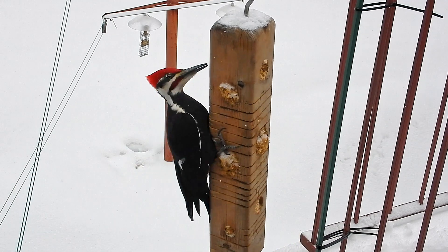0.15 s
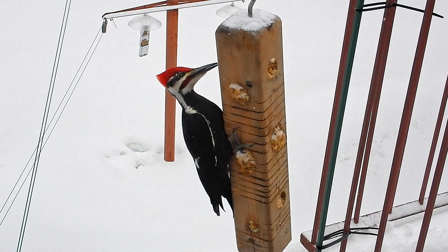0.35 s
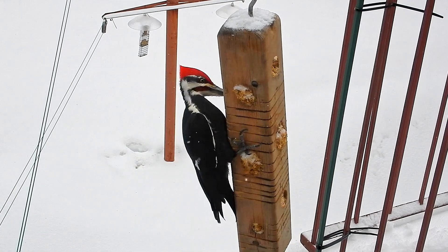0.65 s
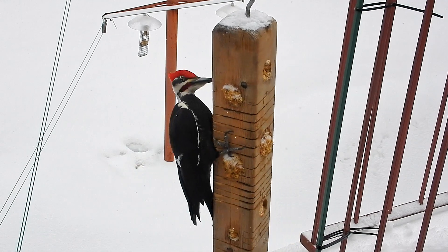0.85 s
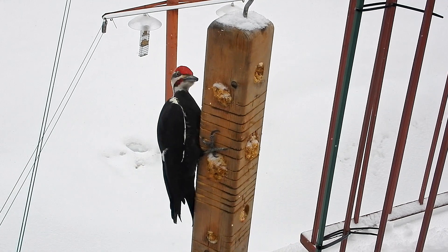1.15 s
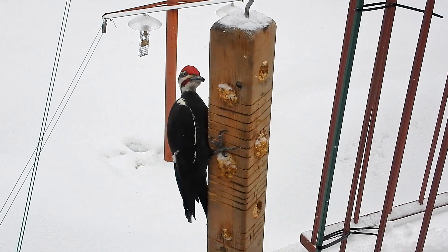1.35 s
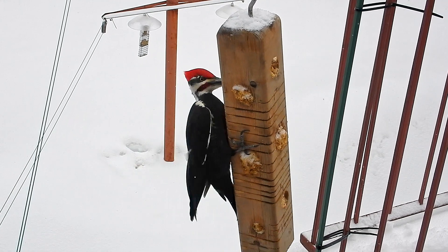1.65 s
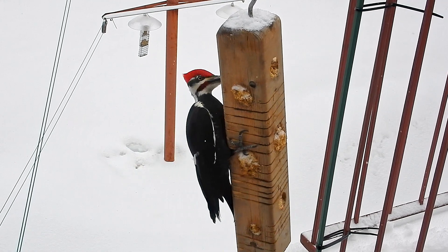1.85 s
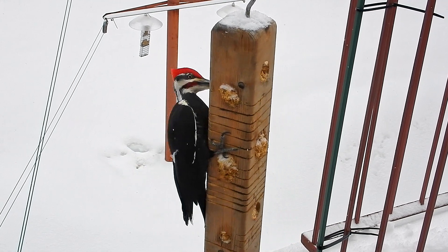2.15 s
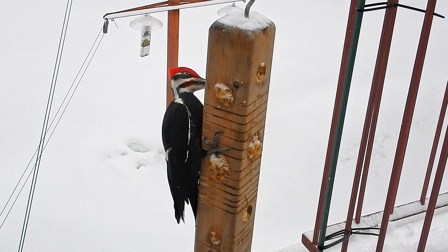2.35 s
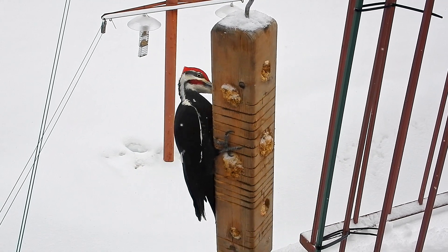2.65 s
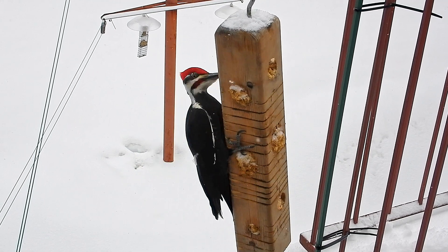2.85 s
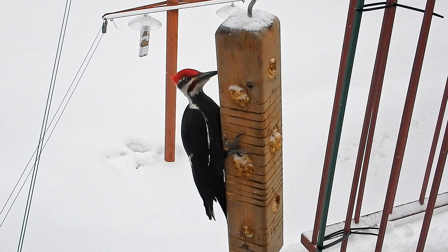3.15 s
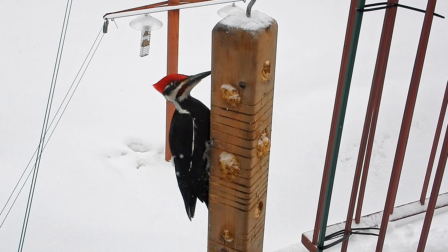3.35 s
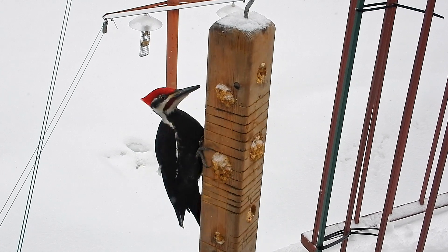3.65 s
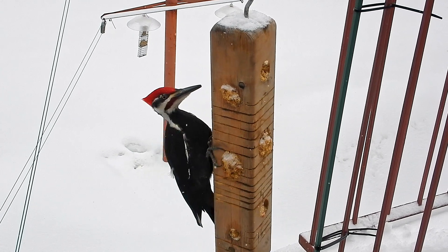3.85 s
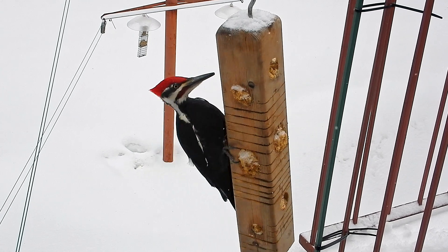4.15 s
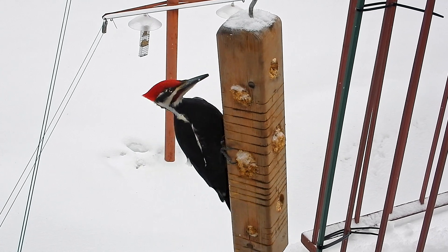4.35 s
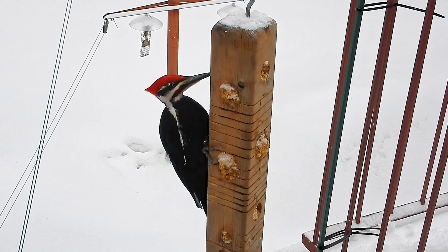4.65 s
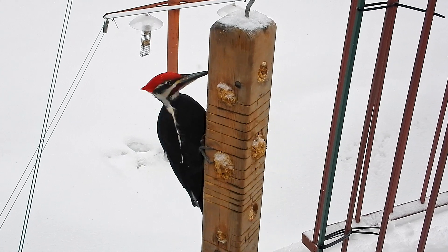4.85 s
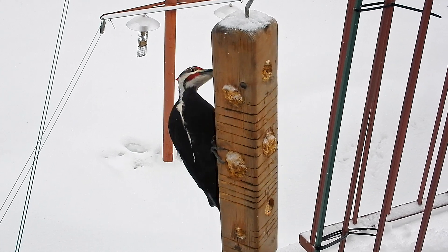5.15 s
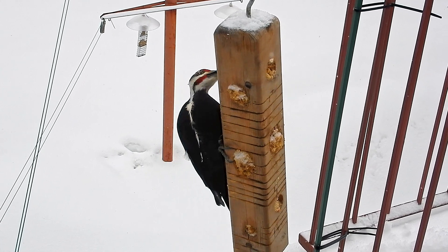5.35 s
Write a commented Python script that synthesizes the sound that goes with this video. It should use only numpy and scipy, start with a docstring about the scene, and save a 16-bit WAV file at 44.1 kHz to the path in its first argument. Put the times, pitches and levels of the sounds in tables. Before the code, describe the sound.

A quiet snowy yard, heard in stereo from close to a woodpecker on a hanging wooden log. From 0.2 to 4.05 s the bird gives sixteen very short nasal calls, each about a twentieth of a second, arching slightly up and down near 950 Hz with a strong octave and reedy upper tones. They are spaced 0.2 to 0.4 s apart, clearly foreground, with a faint dull echo. Small birds twitter thinly far off throughout, with occasional tiny gliding whistles, more frequent after 4.2 s. A high buzzy trill, about seventy pulses a second, swells from around 3.5 s, peaks near 4.2 s and breaks off. Soft wooden knocks follow near 4.5, 4.67 and 4.84 s, with lighter sharp clicks around 5.03 s; the log rings briefly and its hanger hums very faintly. Soft airy hush, slightly fuller at first, low rumbles, faint hum and hiss continue to 5.5 s.

```python
"""First a large woodpecker on a hanging log gives a row of short nasal calls, built from arching sine partials.
Small birds whistle (gliding sines) and twitter far off (many tiny notes) all along; near the end of the calls
a trill (two pulsing voices) swells up and breaks off.
Then bill and claws tap the log: soft knocks set its wood ringing, with sharp cracks and a humming hanger.
From start to end there is a soft outdoor hush of filtered noise, with low rumbles, a faint hum and hiss."""
import sys
import numpy as np
from scipy import signal
from scipy.io import wavfile

SR = 44100
rng = np.random.default_rng(int(sys.argv[2]) if len(sys.argv) > 2 else 0)


def digitize_waveform(pressure):
    """Quantize a signal to 16-bit integers and store it at the path in sys.argv[1].

    Rows of a 2-D input are taken as channels; values are limited to [-1, 1].
    """
    field = np.atleast_2d(pressure).T
    bounded = np.clip(field, -1, 1)
    quanta = np.round(bounded * 32767).astype(np.int16)
    wavfile.write(sys.argv[1], SR, quanta)


N = 243431   # length in samples, about 5.5 s


def from_db(db):
    """Turns decibels into a plain factor."""
    return 10 ** (np.asarray(db) / 20)


def rms_one(x):
    """Scales a sound to an average strength (RMS) of 1."""
    return x / np.sqrt(np.mean(x ** 2) + 1e-20)


def in_time(rows):
    """Draws straight lines between table rows (t/s, values...), one curve per value column."""
    s, *columns = np.transpose(rows)
    return [np.interp(np.arange(N) / SR, s, c) for c in columns]


def at_hz(points, hz):
    """Reads a table (f/Hz, value) at any frequency, evenly along octaves."""
    table_hz, values = np.transpose(points)
    return np.interp(np.log(hz), np.log(table_hz), values)


def add(out, sound, s):
    """Mixes a sound in at time s."""
    i = round(s * SR)
    out[..., i:i + sound.shape[-1]] += sound[..., :N - i]


def band(x, low_hz, high_hz):
    """Keeps mainly what lies between two frequencies."""
    return signal.sosfilt(signal.butter(2, [low_hz, high_hz], "band", fs=SR, output="sos"), x)


def drift(rate):
    """Slow random wandering with spread 1; rate in Hz sets how fast it wanders."""
    step = 40   # computed at every 40th sample, with lines drawn between
    r = np.exp(-2 * np.pi * step * rate / SR)
    noise = rng.standard_normal(N // step + 2002)
    slow = signal.lfilter([1], [1, -2 * r, r * r], noise)[2000:]
    return np.interp(np.arange(N) / step, np.arange(len(slow)), rms_one(slow))


def ring(clicks, hz, t60):
    """A soft contact, one cycle long, sets a sine ringing; it fades by 60 dB in t60 seconds."""
    r = from_db(-60 / (t60 * SR))
    w = 2 * np.pi * hz / SR
    contact = np.hanning(round(SR / hz) + 2)
    soft = np.convolve(clicks, 2 * contact / contact.sum())[:N]
    return signal.lfilter([0, np.sin(w)], [1, -2 * r * np.cos(w), r * r], soft + 1e-18)


def blur(x, t60, wet_db):
    """Distance smears a sound into a short scattered tail, unlike in the two channels."""
    t = np.arange(round(.15 * SR)) / SR
    tail = rng.standard_normal((2, len(t))) * from_db(-60 * t / t60)
    tail /= np.sqrt(np.sum(tail ** 2, 1, keepdims=True))
    return x + from_db(wet_db) * signal.fftconvolve(x, tail, axes=1)[:, :N]


# The calls of the woodpecker, one per row:
# start t/s, length t/s, climb to the top t/s, start f/Hz, top f/Hz, end f/Hz, first partial level/dB,
# second partial with open beak level/dB, its swell as the beak opens level/dB,
# moment when the beak is open (share of the length, 0-1), echo off the log level/dB,
# tilt of the upper partials (dB per kHz)
CALLS = [(0.189, 0.046, 0.021, 759, 990, 798, -24.5, -10.5, 8.5, 0.83, -27, -1.5),
         (0.3909, 0.044, 0.021, 803, 969, 796, -25.5, -11.5, 9, 0.84, -26, -1.5),
         (0.605, 0.044, .020, 758, 958, 787, -25.5, -13.5, 7.5, 0.89, -16, -1),
         (0.9213, 0.045, .022, 782, 957.6, 855, -26.5, -10.5, 10, 0.73, -15.5, -3),
         (1.1276, 0.04, .0185, 872, 968, 836, -27, -12, 9, 0.78, -17.5, -3),
         (1.3928, 0.04, 0.021, 818, 952.4, 844, -27, -11.5, 8.5, 0.77, -17, -2.5),
         (1.6085, 0.038, .0175, 826, 949, 838, -26.5, -12.5, 8.5, 0.68, -21.5, -1.5),
         (1.86, 0.044, 0.019, 833, 975.6, 847, -27.5, -14, 7.5, 0.74, -12, -4),
         (2.1415, 0.041, 0.019, 868, 969, 855, -27.5, -14, 8.5, 0.76, -14, -3),
         (2.3751, 0.042, 0.021, 820, 964, 854, -27, -14, 8.5, 0.79, -14, -3),
         (2.7001, 0.04, 0.018, 833, 953, 847, -29, -15, 8, 0.69, -9.5, -3.5),
         (2.9166, 0.044, 0.022, 827, 975, 846, -26, -12.5, 12, 0.78, -22, -1.5),
         (3.163, 0.041, 0.02, 830, 965, 827, -25.5, -13, 10, 0.79, -21, -1.5),
         (3.5534, 0.049, .0165, 836, 1023, 803, -23, -12, 13, 0.9, -12.5, -2),
         (3.767, 0.041, 0.021, 820, 972, 851, -23.5, -10.5, 9, 0.84, -26, -1.5),
         (4.01, 0.042, 0.023, 796, 954, 756, -25.5, -16, 7, 1, -21, -2)]


def woodpecker():
    """All calls in a row, each with its own pitch arch and loudness, without the surroundings."""
    out = np.zeros(N)
    for s, length, *shape in CALLS:
        add(out, kuk(length, *shape), s - .05 * length)   # kuk() begins 5 % of its length early
    return out


# Throat resonances that colour the upper partials:
# beak shut f/Hz, beak open f/Hz, width f/Hz, beak shut level/dB, beak open level/dB
THROAT = [(2540, 2286, 1210, -14, -3.5), (4010, 3600, 910, 0, -3.5), (4900, 4236, 620, -12.5, -0.5),
          (5790, 5860, 650, -8.5, -3.5), (7150, 6800, 1500, -19, -14.5), (9400, 17000, 670, -37.5, -33)]


def throat(partial_hz, beak):
    """Resonances of the throat slide and change strength as the beak goes from shut (0) to open (1)."""
    power = 0
    for shut_hz, open_hz, width, shut_db, open_db in THROAT:
        centre_hz = shut_hz + (open_hz - shut_hz) * beak
        off = (partial_hz - centre_hz) / (width / 2)
        power = power + (from_db(shut_db + (open_db - shut_db) * beak) / (1 + off ** 2)) ** 2
    return np.sqrt(power)


UPPER_DB = -1.75      # upper partials against the first
WAVER_DB = 3          # unsteadiness of the upper partials
LOG_ECHO_S = 0.0063   # delay of the echo off the log


def kuk(length, climb, start_hz, top_hz, end_hz, first_db, open_db, swell_db, open_at, echo_db, tilt_db):
    """One call: the pitch arches while the beak opens and the second partial swells."""
    u = np.arange(-.05, 1.7, 1 / (length * SR))   # time as a share of the call's length
    top_at = climb / length
    upper_db = first_db + UPPER_DB

    # the pitch arch: rise is 1 at the start and 0 at the top, fall is 0 at the top and 1 at the end
    rise = np.clip(1 - u / top_at, 0, None)
    fall = np.clip((u - top_at) / (1 - top_at), 0, 1.5)
    hz = top_hz - (top_hz - start_hz) * rise ** 2.3 - (top_hz - end_hz) * fall ** 1.698
    phase = 2 * np.pi * np.cumsum(hz) / SR

    beak = np.clip((u - open_at + 0.53) / 0.53, 0, 1)
    beak = beak * beak * (3 - 2 * beak)   # smooth start and stop
    out = from_db(first_db - 10.6 * rise ** 2 - 20.5 * fall ** 4) * np.cos(phase)

    # the second partial's phase shifts a little as the beak opens
    past = np.clip(u - open_at, 0, None)
    second_db = open_db - 0.9 * rise - swell_db * (1 - beak) - 14.5 * past
    out += from_db(second_db) * np.cos(2 * phase - 0.86 * beak)

    # the upper partials waver in strength and phase within a few cycles
    knots = rng.standard_normal((9, 2, 18))
    for k in range(3, 12):
        swing, turn = (np.interp(u, np.linspace(0, 1.7, 18), row) for row in knots[k - 3])
        tilt = tilt_db * (k * hz - 4000) / 1000
        level_db = upper_db - (2 + k) * rise ** 2 + tilt + WAVER_DB * swing
        out += from_db(level_db) * throat(k * hz, beak) * np.cos(k * phase + .5 * turn)

    # a little breath leaks once a cycle
    breath = band(band(rng.standard_normal(5000)[:len(u)], 1800, 6200), 1800, 8000)
    out += from_db(upper_db - 16.0) * breath * (1 + np.cos(phase))

    # the voice stops quickly, then a weak ragged release slides on downward
    ragged_db = 4 * np.interp(u, np.linspace(.9, 1.7, 18), knots[0, 0])
    release = from_db(-12 - 60.0 * np.clip(u - 1, 0, None) + ragged_db)
    voiced = 1 / (1 + np.exp((u - .98) / 0.0047))
    onset = 1 / (1 + np.exp(-(u - .01) / 0.015))
    out *= (voiced + (1 - voiced) * release) * onset

    # the swinging log and the railing return a dull echo whose strength shifts from call to call
    echo = np.roll(band(out, 1600, 2300), round(LOG_ECHO_S * SR))
    return out + from_db(echo_db) * echo


# Touches on the log (also set the hanger humming): t/s, wood level/dB, crack level/dB, crack f/Hz
TAPS = [(4.4917, -33.5, -31.5, 3260), (4.507, -43, -39, 5000), (4.671, -30, -32, 3230),
        (4.685, -51, -40, 5370), (4.838, -28.5, -31.5, 2950), (5.027, -45, -36, 8440),
        (5.032, -45, -30, 6300), (5.057, -45, -34, 2620)]
# Ringing tones of the log: f/Hz, relative level/dB, fade by 60 dB t/s
LOG = [(785, -5, 0.16), (1030, -10, 0.059), (1230, -19, .02), (1690, -14, 0.06), (1713, 8, 0.068),
       (1985, 2.5, 0.039), (2295, -1, 0.055), (3030, 8, 0.0075)]
# Ringing tones of sharp claw and bill contact: f/Hz, relative level/dB, fade by 60 dB t/s
CRACK = [(2273, 9, 0.017), (2980, -22, 0.014), (4200, -9, 0.0086), (5350, 15, 0.0082), (6700, 5, 0.014),
         (8600, 8, 0.0035), (9200, 6, 0.0043)]


def taps():
    """Each touch and its rebound ring the log, and a sharp crack is strongest near its own pitch."""
    s, wood_db, crack_db, crack_hz = np.transpose(TAPS)
    at, out = np.round(s * SR).astype(int), np.zeros(N)
    for hz, level_db, t60 in LOG:
        clicks = np.zeros(N)
        uneven_db = rng.normal(0, 1.5, len(at))
        clicks[at] = -from_db(wood_db + level_db - 13 + uneven_db)
        clicks[at + 130] = -from_db(-4.5) * clicks[at]   # the bill rebounds 3 ms later
        out += ring(clicks, hz, t60)
    for hz, level_db, t60 in CRACK:
        clicks = np.zeros(N)
        uneven_db = rng.normal(0, 1.5, len(at))
        off_pitch_db = -10 * np.log2(hz / crack_hz) ** 2
        clicks[at] = from_db(crack_db + level_db - 9 + off_pitch_db + uneven_db)
        out += ring(clicks, hz, t60)
    return signal.sosfilt(signal.butter(3, 600, "high", fs=SR, output="sos"), out)


# Low hum of the hook and hanger after a knock: f/Hz, level against the wood level/dB, fade by 60 dB t/s
HANGER = [(128, -39, 0.71), (252.5, -34, .35), (930, -27, 0.54)]


def hanger():
    """Knocks on the log set the hanger humming, with a wavering strength."""
    s, wood_db = np.transpose(TAPS)[:2]
    clicks = np.zeros(N)
    clicks[np.round(s * SR).astype(int)] = from_db(wood_db)
    out = np.zeros(N)
    for hz, db, t60 in HANGER:
        out += from_db(db + 3 * drift(12)) * ring(clicks, hz, t60)
    return band(out, 100, 1200)


# Farther echoes of wall and house: delay t/s, left level/dB, right level/dB
ECHOES = [(.0165, -31.5, -24.5), (.027, -28.5, -28), (.044, -34, -31.5), (.056, -35.5, -36.5),
          (.063, -35, -35)]
GARDEN_T60_S, GARDEN_DB = 0.74, -38.5   # fade of the garden's tail by 60 dB, and its level


def surroundings(x):
    """Wall and house send back a few echoes, then house and trees a dull scattered tail."""
    t = np.arange(round(.9 * SR)) / SR
    tail = rng.standard_normal((2, len(t))) * from_db(-60 * t / GARDEN_T60_S) * np.clip(t / 0.023, 0, 1)
    tail = band(tail + 0.86 * tail[::-1], 390, 2900)   # the two sides partly alike
    answer = from_db(GARDEN_DB) * tail / np.sqrt(np.sum(tail ** 2, 1, keepdims=True))
    for delay, left_db, right_db in ECHOES:
        answer[0, round(delay * SR)] += from_db(left_db)
        answer[1, round(delay * SR) + 3] += from_db(right_db)
    return signal.fftconvolve(answer, x[None], axes=1)[:, :N]


def whistle(length, start_hz, end_hz, db):
    """A gliding sine that swells and fades under a rounded envelope."""
    u = np.arange(0, 1, 1 / (length * SR))
    hz = start_hz + (end_hz - start_hz) * u
    return from_db(db) * np.sin(np.pi * u) * np.sin(2 * np.pi * np.cumsum(hz) / SR)


# Single whistles of small birds: start t/s, length t/s, start f/Hz, end f/Hz, peak before the blur level/dB
WHISTLES = [(0.266, 0.022, 7400, 6600, -52), (0.529, 0.056, 3800, 3050, -53),
            (1.058, 0.033, 5500, 5160, -50.5), (1.932, 0.11, 5300, 5500, -56),
            (2.02, 0.033, 5500, 4250, -59), (2.06, 0.042, 4300, 4340, -58), (2.87, 0.021, 4800, 5650, -51),
            (4.188, 0.025, 3700, 3280, -53), (4.218, 0.045, 3650, 3020, -49),
            (4.322, 0.035, 6000, 4800, -44.5), (4.335, 0.05, 3700, 2880, -51), (4.46, .02, 4900, 5400, -52),
            (4.654, 0.033, 3800, 3590, -52), (4.79, .025, 4800, 5500, -49), (4.842, 0.041, 5700, 4900, -50),
            (5.028, 0.038, 3600, 2850, -51), (5.138, 0.033, 7200, 7240, -54),
            (5.179, 0.047, 3600, 2990, -50), (5.2, 0.037, 5600, 5100, -48.5),
            (5.472, 0.039, 5200, 5520, -45)]
# Loudness of the far twittering flock: t/s, level/dB
FLOCK = [(0, -56.5), (1.2, -57), (1.6, -60), (2, -57.5), (3.2, -58.5), (3.5, -54.5), (4.3, -53),
         (4.55, -53.5), (5, -57), (5.52, -51.5)]


def small_birds():
    """Single whistles, a trill, and a far flock whose short notes fall at random places."""
    near, far = np.zeros(N), np.zeros((2, N))
    for s, *shape in WHISTLES:
        add(near, whistle(*shape), s)
    for when, long, pitch, glide, loud, side in rng.random((1800, 6)):
        hz = 5300 + 330 * np.tan(2.5 * (pitch - .5))   # most notes near 5300 Hz, a few far from it
        note = whistle(.006 + .016 * long, hz, hz + 1100 * (glide - .55), 7 * loud)
        left_right = from_db([[6 * (side - .5)], [6 * (.5 - side)]])
        add(far, note * left_right, when * N / SR)
    flock_db, = in_time(FLOCK)
    far = from_db(flock_db) * rms_one(blur(far, t60=.12, wet_db=3))
    near = blur(near * np.ones((2, 1)), t60=.12, wet_db=1)
    return near + blur(trill(), t60=.08, wet_db=-1) + far


# The buzzy trill, one voice per row: top t/s, top before the blur level/dB, swell (dB per s), fade (dB per s),
# pitch at the top f/Hz, width of the flick f/Hz, left against right level/dB
TRILL_VOICES = [(4.22, -43.5, 44.5, 162, 5396, 998, -3.5), (4.269, -54.5, 34, 200, 7460, 924, 1.5)]
TRILL_PER_S, TRILL_CLIMB_HZ_PER_S = 70, 400   # average pulses per second, and slow climb of the pitch


def trill():
    """Two voices flick upward, pulse together, climb slowly in pitch throughout, swell to the top and fade."""
    t = np.arange(N) / SR
    turn = np.cumsum(TRILL_PER_S * (1 + .03 * drift(8))) / SR % 1   # place within the pulse, 0-1
    pulse = rms_one(np.sin(np.pi * turn) ** 2 * from_db(2.0 * drift(40))) * np.sqrt(2)
    flick = turn - .5 + .14 * drift(150)
    out = 0
    for top, top_db, swell_db, fade_db, hz, flick_hz, pan_db in TRILL_VOICES:
        level_db = top_db - swell_db * np.clip(top - t, 0, None) - fade_db * np.clip(t - top, 0, None)
        pitch = hz + TRILL_CLIMB_HZ_PER_S * (t - top) + flick_hz * flick
        left_right_db = pan_db * np.array([[.5], [-.5]])
        out = out + from_db(level_db + left_right_db) * np.sin(2 * np.pi * np.cumsum(pitch) / SR)
    return pulse * out


# Colour of the hush: f/Hz, relative level/dB (per Hz)
AIR = [(24, -62), (40, -36), (185, -8.5), (433, -7.5), (503, -4), (1240, -2), (1410, -7), (1850, 1),
       (2500, -12.5), (2770, -1.5), (5580, -7), (8130, -7), (9940, 4.5), (16000, -29)]
# How alike left and right are: f/Hz, likeness (1 same, 0 unrelated, -1 opposite)
LIKENESS = [(60, 0.46), (150, 0.81), (380, 0.82), (950, 0.79), (2380, 0.58), (5980, 0.29), (15000, -0.93)]
# Extra strength of the hush around 1.5 kHz: t/s, relative level/dB
HUSH_MIDDLE = [(0, 8), (0.6, 5.5), (1.4, 3), (1.7, -1), (5.52, 1)]
HUSH_DB = -53


def hush():
    """Third-octave bands of stereo noise, each with its own level, flicker and likeness; rumble, hum, hiss."""
    middle_db, = in_time(HUSH_MIDDLE)
    edges = 60 * 2 ** np.arange(0, 7.4, 1 / 3)
    white = rng.standard_normal((2, 2, N))   # two noise pairs, so that neighbouring bands differ
    out = 0
    for k, (low, high) in enumerate(zip(edges, edges[1:])):
        mid, side = band(white[k % 2], low, high)
        hz = np.sqrt(low * high)
        alike = np.clip(at_hz(LIKENESS, hz), -1, 1)
        near_middle = np.exp(-np.log2(hz / 1500) ** 2 / .5)
        gain = from_db(at_hz(AIR, hz) + 1.5 * drift(5.4) + middle_db * near_middle)
        out = out + gain * (np.sqrt(1 + alike) * mid + np.sqrt(1 - alike) * side * [[1], [-1]])
    out = signal.sosfilt(signal.cheby2(8, 35, 9300, fs=SR, output="sos"), out)
    return from_db(HUSH_DB) * rms_one(out) + rumble() + hum(white[0, 0, ::-1]) + hiss()


# Low thumps and rumbles, several together with calls: middle t/s, width t/s, level/dB
RUMBLES = [(0.23, 0.036, -68), (0.41, 0.073, -63.5), (0.65, .05, -69), (2.74, 0.094, -71),
           (3.2, 0.031, -66), (3.7, 0.28, -77), (4.58, 0.13, -64), (4.9, 0.24, -70)]
RUMBLE_FLOOR_DB = -87   # steady low noise beneath the thumps


def rumble():
    """Low noise, rather different left and right, swells at each thump or rumble and wavers."""
    t = np.arange(N) / SR
    swells = from_db(RUMBLE_FLOOR_DB)
    for s, width, db in RUMBLES:
        swells = swells + from_db(db) * np.exp(-(2 * (t - s) / width) ** 2)
    mid, side = band(band(rng.standard_normal((2, N)), 70, 290), 60, 570)
    return rms_one(mid + 1.2 * side * [[1], [-1]]) * swells * from_db(0.92 * drift(10))


HUM_HZ, HUM_DB, HUM_WIDTH_HZ = 497.5, -78, 20   # the width reaches this far to either side


def hum(noise):
    """A narrow band of noise sounds like a faint wavering hum."""
    return from_db(HUM_DB) * rms_one(band(noise, HUM_HZ - HUM_WIDTH_HZ, HUM_HZ + HUM_WIDTH_HZ))


HISS_DB = -66.5


def hiss():
    """Steady high noise, separate in the two channels."""
    return rms_one(band(rng.standard_normal((2, N)), 4800, 22000)) * from_db(HISS_DB)


def scene():
    """The bird sits a little right; the left port hears its treble shaded and late."""
    bird = woodpecker() + taps() + hanger()
    treble = signal.sosfilt(signal.butter(1, 4000, "high", fs=SR, output="sos"), bird)
    late = np.roll(treble, 3)   # 3 samples
    left = bird - 0.27 * treble + 0.21 * late
    right = bird + 0.36 * treble - 0.079 * late
    return np.array([left, right]) + surroundings(bird) + small_birds() + hush()


# Dips made by the housing of the microphone: f/Hz, width f/Hz, level/dB
NOTCHES = [(2500, 260, -13), (5150, 400, -7), (7550, 200, -5), (8900, 200, -6)]
CUTOFF_HZ = 16050   # nearly nothing is left above this


def record(dry):
    """The microphone's housing makes narrow dips, then the bass is cut gently and the top steeply."""
    for hz, width, db in NOTCHES:
        r, w = np.exp(-np.pi * width / SR), 2 * np.pi * hz / SR
        peak = signal.lfilter([(1 - r * r) / 2, 0, (r * r - 1) / 2], [1, -2 * r * np.cos(w), r * r], dry)
        dry = dry - (1 - from_db(db)) * peak   # take away part of what lies around hz
    dry = signal.sosfilt(signal.butter(1, 70, "high", fs=SR, output="sos"), dry)
    return signal.sosfilt(signal.cheby2(14, 60, CUTOFF_HZ, fs=SR, output="sos"), dry)


dry = scene()
out = record(dry)
digitize_waveform(out)
```